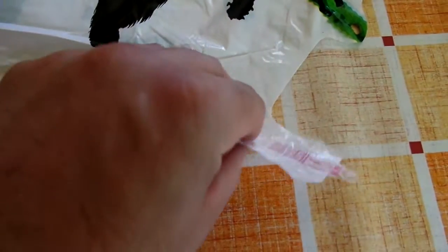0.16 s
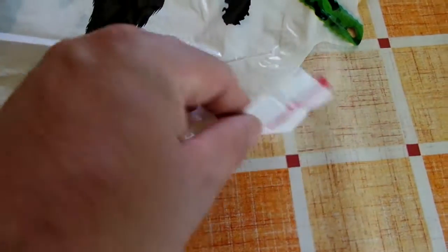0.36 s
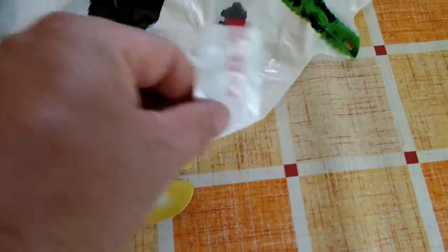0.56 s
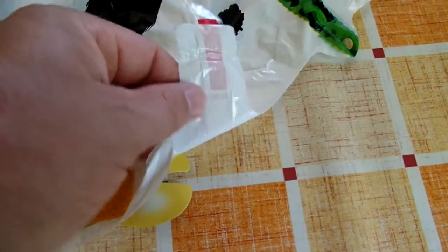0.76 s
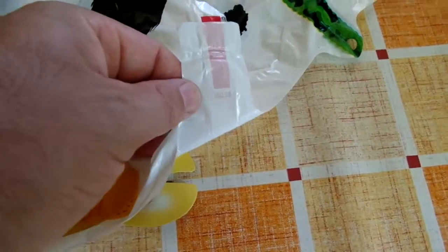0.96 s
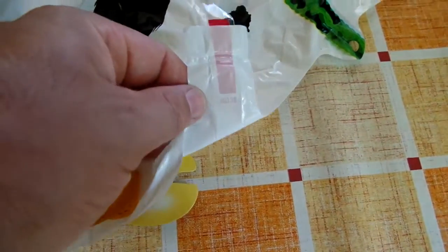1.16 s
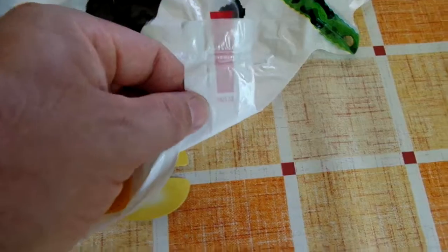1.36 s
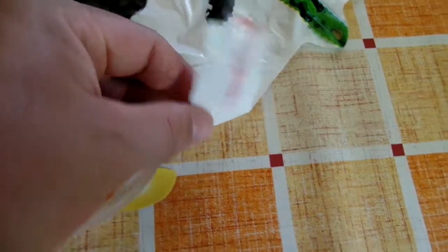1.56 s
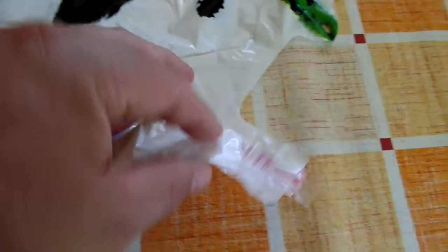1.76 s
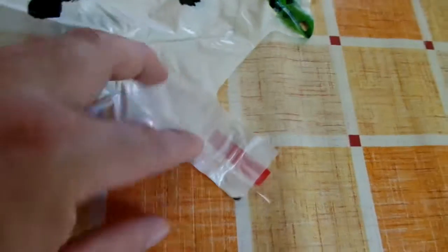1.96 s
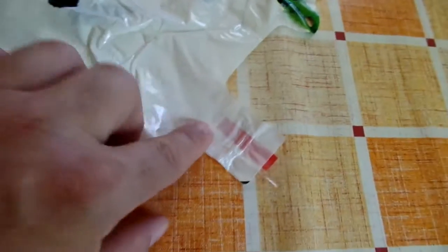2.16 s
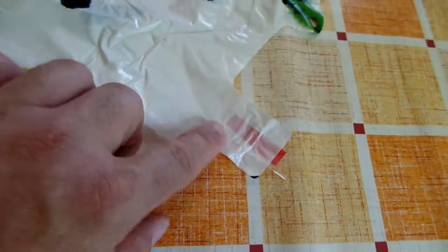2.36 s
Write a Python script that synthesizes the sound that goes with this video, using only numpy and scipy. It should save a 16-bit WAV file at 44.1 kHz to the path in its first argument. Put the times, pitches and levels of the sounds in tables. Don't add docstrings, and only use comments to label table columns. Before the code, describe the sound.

Crisp foil crinkle: sharp, bright snaps in a dense burst, then sparser crackles and soft rustling indoors

```python
import sys
import numpy as np
from scipy import signal
from scipy.fft import rfft, irfft
from scipy.io import wavfile
from scipy.ndimage import uniform_filter1d, minimum_filter1d

SR = 44100
rng = np.random.default_rng(int(sys.argv[2]) if len(sys.argv) > 2 else 0)


def how_loud(loudness_db):
    steps = np.asarray(loudness_db, float) / 20
    return 10 ** steps


def generate_wav(signal):
    frames = np.transpose(np.atleast_2d(signal))
    scaled = np.clip(frames, -1, 1) * 32767
    pcm = np.round(scaled).astype(np.int16)
    wavfile.write(sys.argv[1], SR, pcm)


N = 105840

RING_T60_S, RING_RISE_S, RING_DB = .0042, .0001, 1
SIDE_HZ, SIDE_DB, SIDE_FALL_DB = 1395, -6.5, 5
CRACK_T60_S, CRACK_DB = .003, -2.0
TICK_T60_S, TICK_DB, TICK_PEAK_HZ = .0035, 4.5, 13800
SETTLE_T60_S, SETTLE_DB = .09, -7.0
TREMOR_T60_S, TREMOR_DB = .06, -6.0
DULL_SLOWING = .026
THIN_HZ = 1050


def highpass(x, order, hz):
    return signal.sosfilt(signal.butter(order, hz, "high", fs=SR, output="sos"), x)


def rms_one(x):
    return x / np.sqrt(np.mean(x ** 2) + 1e-20)


def unit(x):
    return x / np.sqrt(np.sum(x ** 2))


def dying(noise, t60):
    return unit(noise * how_loud(-60 * np.arange(len(noise)) / SR / t60))


def colour(x, points):
    hz, db = np.transpose(points)
    grid = np.maximum(np.arange(N // 2 + 1) * SR / N, 1)
    gain = how_loud(np.interp(np.log(grid), np.log(hz), db))
    return rms_one(irfft(rfft(x) * gain, N))


def crease_ring(hz, slow, size):
    side = SIDE_HZ * np.arange(1, 6) * (1 + .08 * (rng.random(5) - .5))
    modes = np.r_[hz, side][:, None]
    late = 0.000392 * np.r_[0, rng.random(5)][:, None]
    octaves = abs(np.log2(side / hz))
    side_db = SIDE_DB - slow * SIDE_FALL_DB * octaves + 8 * (rng.random(5) - .5)
    gains = how_loud(np.r_[0, side_db])
    age = np.maximum(np.arange(size) / SR - late, 0)
    rise = 1 - np.exp(-(age / RING_RISE_S / slow ** 3) ** 2)
    fall = how_loud(-60 * age / RING_T60_S / slow)
    return gains @ (np.sin(2 * np.pi * modes * age) * rise * fall)


def snap(hz, bright_db, size):
    dull_db = min(bright_db, 0)
    ring = crease_ring(hz, 1 - DULL_SLOWING * dull_db, size)
    noise = rng.standard_normal(size)

    near = signal.butter(2, [hz / 2, min(hz * 1.6, 15000)], "band", fs=SR, output="sos")
    crack = signal.sosfilt(near, dying(np.roll(noise, 900), CRACK_T60_S))
    settle = signal.sosfilt(near, dying(np.roll(noise, 1700) ** 3, SETTLE_T60_S))
    body = unit(ring) + how_loud(CRACK_DB + dull_db / 2) * unit(crack)
    body = body + how_loud(SETTLE_DB + dull_db / 3) * unit(settle)

    tick = highpass(dying(noise, TICK_T60_S), 3, 7500)
    tick = tick + signal.lfilter(*signal.iirpeak(TICK_PEAK_HZ, 3.0, fs=SR), tick)
    tremor = highpass(dying(noise[::-1], TREMOR_T60_S), 3, 1500)
    bright = how_loud(TICK_DB + bright_db) * unit(tick)
    return how_loud(RING_DB) * body + bright + how_loud(TREMOR_DB + bright_db / 2) * tremor


# t/s, body level/dB, ring f/Hz, tick level over body/dB
CREASE_SNAPS = [(0.0129, -55, 3320, 3), (0.0262, -43, 3100, -3), (0.029, -53, 4400, -8),
                (0.0548, -51, 4090, -8), (0.1029, -42, 2630, 1), (0.2067, -44, 2630, -13),
                (0.2372, -33, 1380, -22), (0.2505, -43, 3660, -4), (0.2631, -34, 3530, 4),
                (0.2695, -36, 4350, -4), (0.28, -35, 2450, -4), (0.2849, -38, 1340, -3),
                (0.3483, -25, 3350, -6), (0.362, -33, 5380, -4), (0.4133, -25, 3600, 0),
                (0.4483, -27, 3140, -6), (0.4553, -31, 2800, -8), (0.4774, -30, 2760, -4),
                (0.4855, -38, 7320, -2), (0.4951, -39, 3190, -2), (0.5326, -41, 3140, -16),
                (0.5446, -39, 2330, -7), (0.5563, -39, 1770, 1), (0.5616, -33, 4390, 3),
                (0.5669, -40, 5040, -3), (0.5868, -37, 6890, 1), (0.5932, -42, 6680, 0),
                (0.6012, -41, 5340, -3), (0.6146, -31, 6930, -9), (0.6229, -34, 6890, -2),
                (0.6334, -41, 7020, -6), (0.6405, -45, 5730, 2), (0.6715, -43, 6890, 4),
              (0.679, -45, 1720, -2), (0.7057, -48, 1890, 4), (0.7213, -36, 4820, -6),
              (0.7567, -52, 2410, -12), (0.7783, -46, 2630, -11), (0.8289, -51, 5770, -20),
              (0.8559, -42, 3010, -15), (0.9155, -39, 4440, 1), (0.9208, -54, 6590, 8),
              (0.9913, -46, 4180, -24), (1.0291, -44, 5560, -30), (1.1295, -59, 6030, -18),
              (1.5209, -59, 2800, 1), (1.5897, -51, 4350, -7), (1.6352, -49, 2580, -6),
              (1.6536, -53, 2800, 1), (1.6603, -48, 2800, -6), (1.6921, -46, 2670, -7),
              (1.7048, -49, 2450, -10), (1.7389, -53, 2760, -8), (1.7583, -48, 2800, -12),
              (1.7639, -49, 2670, -12), (1.7971, -45, 3060, -12), (1.8409, -48, 3140, -4),
              (1.8652, -45, 3660, -6), (1.8789, -39, 3270, -9),
                (1.8873, -36, 3360, -9), (1.9494, -40, 3100, -24), (2.0941, -48, 2970, 4),
               (2.1017, -36, 2370, 0), (2.1166, -33, 3060, -10), (2.1464, -36, 5450, -3),
               (2.1788, -41, 2070, -5), (2.1843, -44, 2840, -14), (2.2206, -49, 2890, -18),
               (2.2367, -48, 3140, -18), (2.3176, -46, 2450, -9), (2.3303, -49, 5640, -18),
               (2.3488, -41, 2500, -4), (2.3576, -42, 2450, -15), (2.3657, -44, 1810, -20),
               (2.3784, -41, 2020, -12),
                (0.0397, -56, 3070, -12), (0.1265, -47, 2560, -10), (0.147, -63, 4900, 4),
               (0.278, -42, 2800, -10), (0.3595, -42, 3040, -8), (.3715, -44, 3050, -10),
               (0.4102, -38, 2700, 2), (0.4437, -42, 2400, -14), (0.4795, -37, 2580, -14),
               (0.5592, -42, 4430, 2), (.5845, -42, 6500, -4), (0.9627, -50, 5700, -14),
               (1.73, -56, 5030, -13), (2.1073, -41, 2550, -14), (2.3415, -53, 2480, -9),
               (2.1176, -33, 1400, -7), (0.6148, -36, 2940, -20), (0.7235, -43.5, 3000, -24),
               (1.0302, -49.5, 4120, -30), (0.35, -40, 1330, -14), (2.1467, -36, 3300, -12),
               (2.103, -39, 1400, -4), (.365, -44, 2300, -12), (.4137, -29, 2400, -8), (.422, -42, 3500, 2),
               (.5342, -40, 1900, -14), (.6055, -46, 6000, -6), (.6625, -47, 5800, -10),
               (.6665, -46, 9000, 4), (.6855, -43, 2300, -2), (.696, -46, 9800, 0),
               (1.8425, -50, 2800, -12), (1.855, -47, 3300, -12), (1.8735, -47, 3300, -12),
               (1.8892, -39, 4500, -8), (1.9512, -45, 3000, -20), (2.0885, -59, 2500, 2),
               (2.0915, -49, 5500, -4), (2.1138, -44, 2800, -14), (2.1218, -45, 2800, -2),
               (2.1295, -48, 3300, -6), (2.152, -50, 3500, -2), (2.301, -53, 3800, -12),
               (2.308, -59, 6200, 2), (2.3185, -50, 6400, -10), (2.3662, -45, 3100, -16),
               (2.3685, -47, 1900, -20), (.9915, -50, 5700, -24), (2.179, -46, 5500, -12),
               (.8562, -48, 5500, -14)]


def snaps():
    out, size = np.zeros(N + SR), 3600
    for s, db, hz, bright_db in CREASE_SNAPS:
        i = int(s * SR)
        out[i:i + size] += how_loud(db + 13.0) * snap(hz, bright_db, size)
    return highpass(out[:N], 4, THIN_HZ)


CRACKLES_PER_S, CRACKLE_SPREAD_DB, CRACKLE_CYCLES, CRACKLE_DB = 300, 4.0, 9.0, -11


def crackles():
    size_db = CRACKLE_SPREAD_DB * np.minimum(rng.exponential(1, N), 2.5)
    clicks = how_loud(size_db) * (rng.random(N) < CRACKLES_PER_S / SR)
    dealt, t, grains = rng.integers(0, 12, N), np.arange(400) / SR, 0
    for k, hz in enumerate(np.geomspace(1800, 7000, 12)):
        grain = np.sin(2 * np.pi * hz * t) * how_loud(-60 * t * hz / CRACKLE_CYCLES)
        grains = grains + np.convolve(clicks * (dealt == k), grain)[:N]
    return how_loud(CRACKLE_DB) * rms_one(grains)


GRIP_DB = 2.0
# t/s, level/dB
RUB_EFFORT = [(0, -68), (.11, -55), (.22, -60), (0.277, -47), (.335, -53.5), (.45, -50), (0.681, -53),
              (.78, -60.5), (.91, -65), (.925, -59), (1.15, -81), (1.6, -68.5), (1.66, -64.5), (1.82, -64),
              (2.075, -85), (2.098, -52), (2.2, -60), (2.29, -69.5), (2.37, -56)]
# peak t/s, level/dB, rise/s and fall/s per 20 dB
FINGER_SLIDES = [
    (1.276, -62, 0.037, 0.12),
    (1.386, -62, 0.043, .09),
    (1.531, -59, 0.035, 0.14),
    (1.861, -54.5, 0.054, .2),
]
# f/Hz, level/dB
RUB_COLOUR = [(300, -14.5), (900, 4), (1500, -5), (3000, -0.5), (5000, -2.5), (9000, -2.5), (14000, -2.5),
              (16500, 1)]


def rustle():
    now = np.arange(N) / SR
    power = how_loud(2 * np.interp(now, *np.transpose(RUB_EFFORT)))
    for s, top_db, rise, fall in FINGER_SLIDES:
        drop_db = 20 * np.maximum((s - now) / rise, (now - s) / fall)
        power = power + how_loud(2 * (top_db - drop_db))
    grains = crackles()
    knots = np.arange(0, N + 300, 300)
    grip = np.interp(np.arange(N), knots, rng.standard_normal(len(knots)))
    hiss = how_loud(GRIP_DB * grip) * colour(rng.standard_normal(N), RUB_COLOUR)
    return np.sqrt(power) * (hiss + grains)


BUMP_T60_S, BUMP_RISE_S = 0.13, 0.0087
# t/s, level/dB, f/Hz
TABLE_BUMPS = [
    (0.274, -51.5, 95.6),
    (0.601, -63, 60.3),
    (1.876, -54, 79),
    (2.3, -61.5, 82),
]


def bumps():
    out = np.zeros(N)
    for s, db, hz in TABLE_BUMPS:
        age = np.maximum(np.arange(N) / SR - s, 0)
        swell = how_loud(db - 60 * age / BUMP_T60_S) * (1 - np.exp(-age / BUMP_RISE_S))
        out += swell * np.sin(2 * np.pi * hz * age)
    return out


ROOM_T60_S, ROOM_DB, ROOM_LIFT = .55, -11, 0.29


def room(x):
    tail = np.r_[np.zeros(150), dying(rng.standard_normal(SR), ROOM_T60_S)]
    tail = signal.lfilter([1, -ROOM_LIFT], [1], tail)
    return how_loud(ROOM_DB) * signal.fftconvolve(x, tail)[:N]


def scene():
    foil = snaps() + rustle()
    return (foil + room(foil) + bumps())[None]


TONE_DB, GATE_SHARE, GATE_RELEASE_S, GATE_KNEE_DB = -67, 0.43, 0.023, -69
# f/Hz, level/dB
TONE_COLOUR = [(15, -51), (25, -0.5), (44, -3.5), (263, 1.5), (2690, -7), (14800, -13),
               (16000, -17)][:-2] + [(15000, -16.5), (16500, -45.0)]


def gated_room_tone(x):
    log_power = np.log(uniform_filter1d(x ** 2, 200) + 1e-9)
    between = uniform_filter1d(log_power, int(GATE_RELEASE_S * SR))
    over_db = np.maximum(10 * between / np.log(10) - GATE_KNEE_DB, -6)
    return how_loud(TONE_DB + GATE_SHARE * over_db) * colour(rng.standard_normal(N), TONE_COLOUR)


HUSH_S, HUSH_OVER_DB, HUSH_HZ, HUSH_DB = .013, 20, 4500, -16
PATCH_HZ, PATCH_S, PATCH_SPREAD_DB, AFTER_DB = 1800, .007, 4, 7


def level_db(x, width):
    return 10 * np.log10(uniform_filter1d(x ** 2, width) + 1e-12)


def sliding_peak(x, size, origin=0):
    return -minimum_filter1d(-x, size, origin=origin)


def starve(x):
    size, step = int(HUSH_S * SR), int(PATCH_S * SR)
    treble = signal.butter(4, HUSH_HZ, "high", fs=SR, output="sos")
    loud_db = level_db(signal.sosfiltfilt(treble, x), 60)
    ahead_db = sliding_peak(loud_db, size, -(size // 2))
    behind_db = sliding_peak(loud_db, size, (size - 1) // 2) - AFTER_DB
    here_db = sliding_peak(level_db(how_loud(loud_db), 90), 130)
    under_db = np.maximum(ahead_db, behind_db) - here_db
    out = x.copy()
    for low in np.arange(HUSH_HZ, 14500, PATCH_HZ):
        sos = signal.butter(3, [low, low + PATCH_HZ], "band", fs=SR, output="sos")
        band = signal.sosfiltfilt(sos, x)
        luck = np.repeat(rng.standard_normal(N // step + 2), step)[rng.integers(step):][:N]
        hushed = (under_db + PATCH_SPREAD_DB * luck > HUSH_OVER_DB) & (under_db > 9)
        out -= band * uniform_filter1d(1. * hushed, 60) * (1 - how_loud(HUSH_DB))
    return out


TOP_HZ, TOP_LEAK_DB = 15850, -36


def cut_top(x):
    hz = np.arange(N // 2 + 1) * SR / N
    return irfft(rfft(x) * np.where(hz < TOP_HZ, 1, how_loud(TOP_LEAK_DB)), N)


def band_limit(x):
    return signal.sosfilt(signal.butter(12, 16990, fs=SR, output="sos"), x)


def record(dry):
    mix = starve(dry[0] + gated_room_tone(dry[0]))
    return band_limit(cut_top(mix)[None])


dry = scene()
out = record(dry)
generate_wav(out)
```